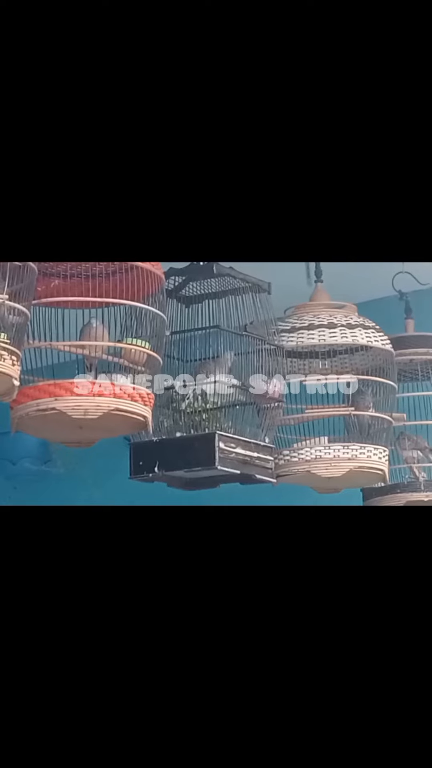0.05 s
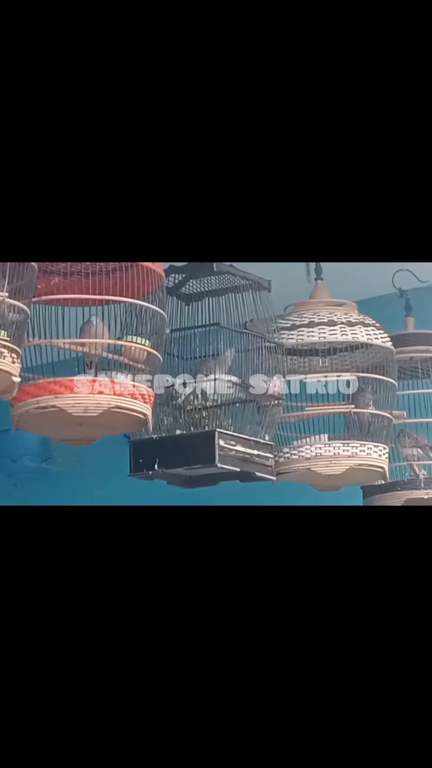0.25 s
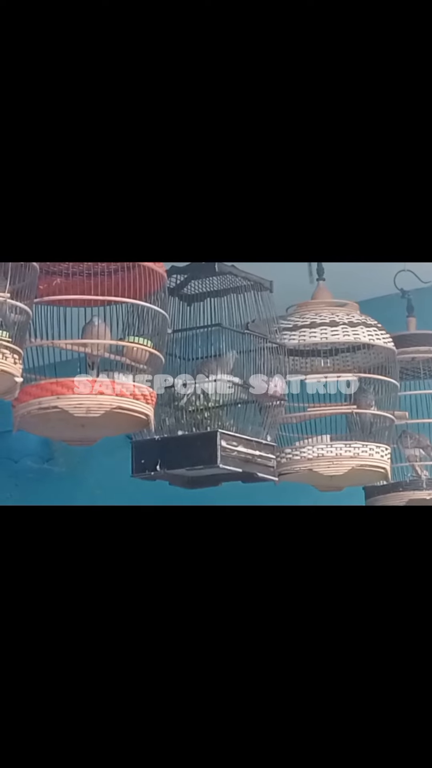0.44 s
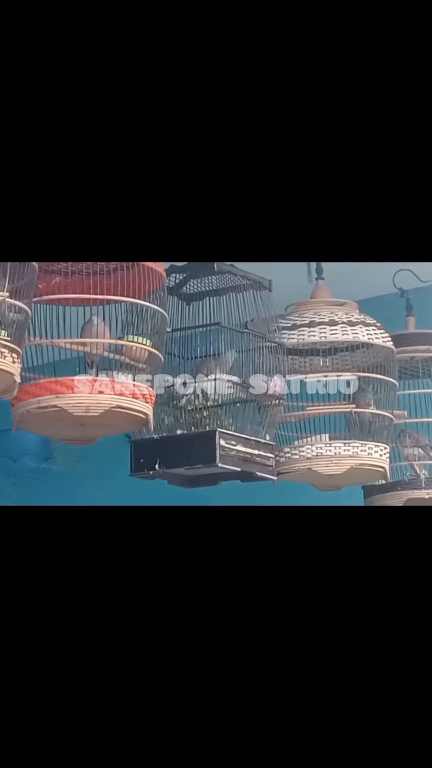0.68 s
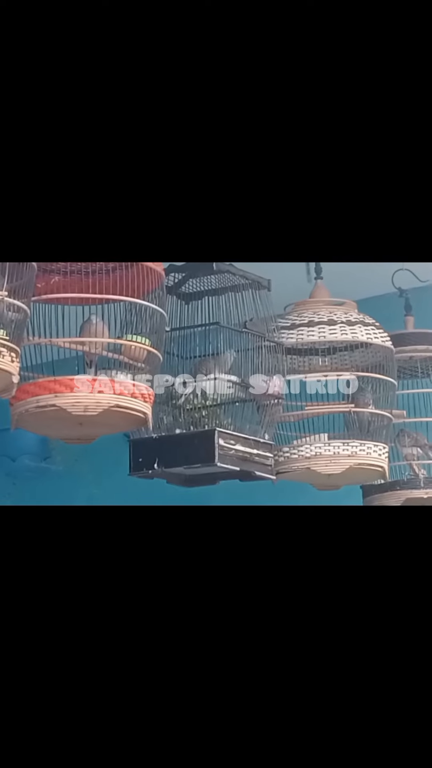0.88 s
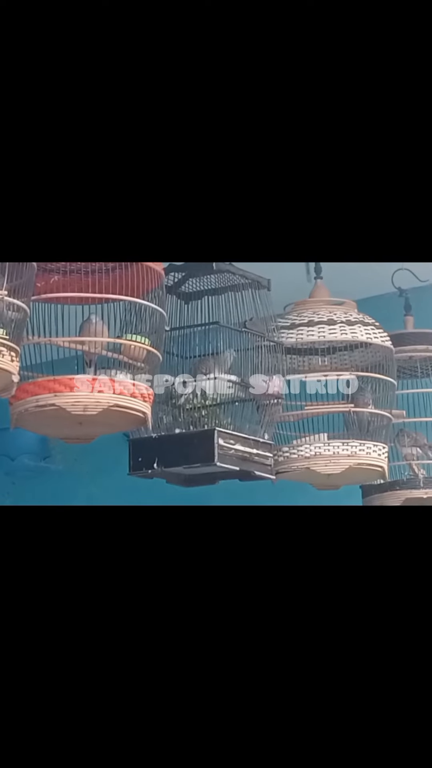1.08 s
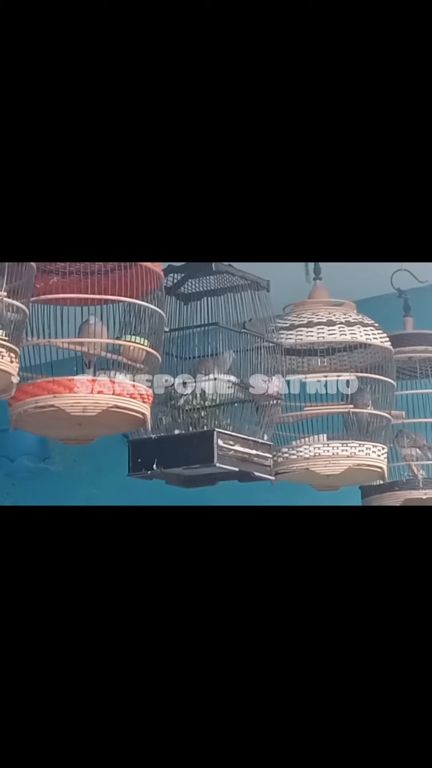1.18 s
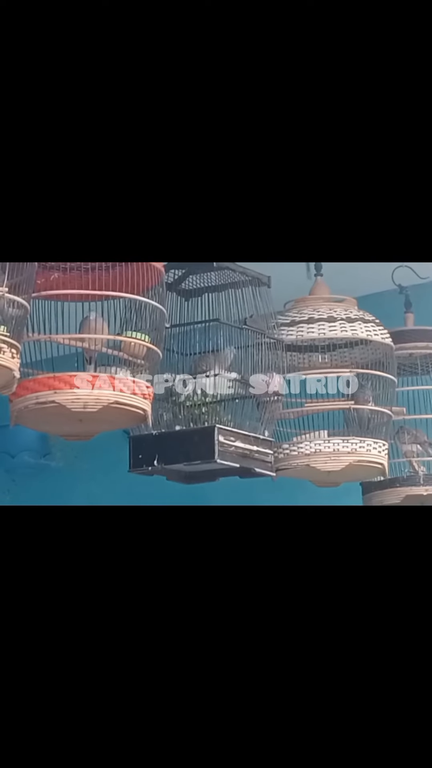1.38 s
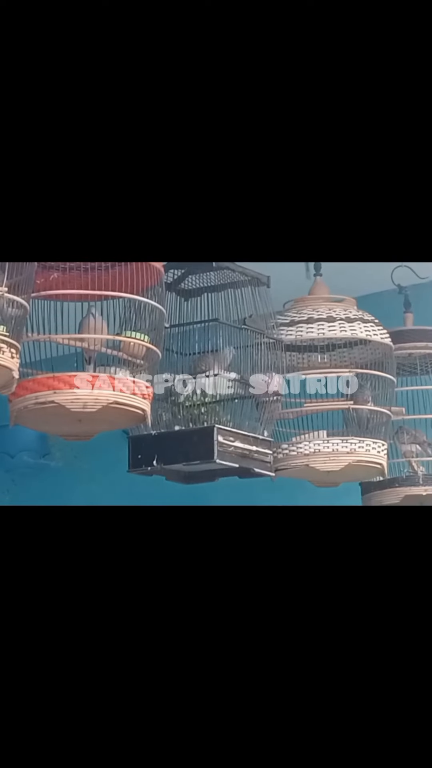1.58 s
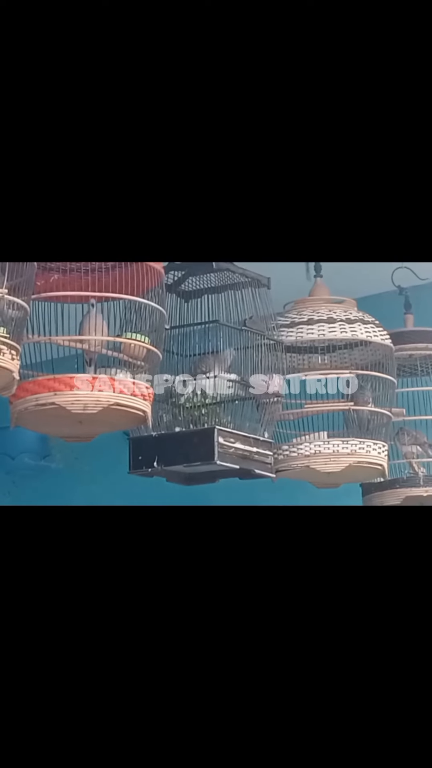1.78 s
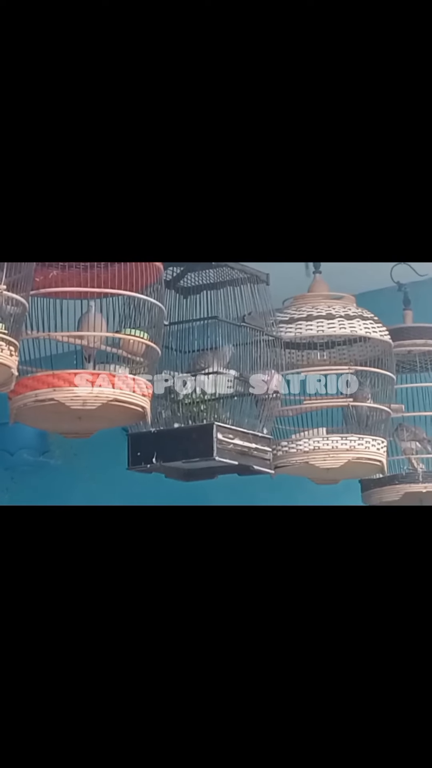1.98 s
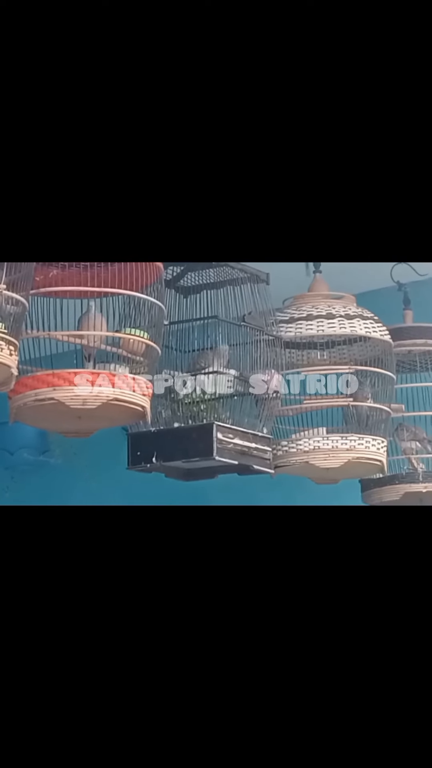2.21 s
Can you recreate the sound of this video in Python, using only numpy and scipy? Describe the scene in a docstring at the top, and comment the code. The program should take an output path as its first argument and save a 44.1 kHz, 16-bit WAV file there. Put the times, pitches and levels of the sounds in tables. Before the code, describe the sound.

A caged dove close by sings one quick phrase of whistled coos, a longer opening, three short notes and two drawn-out ones; echoes fade over soft distant doves, faint chirps and low outdoor rumble.

```python
"""Under a hard-walled porch a caged zebra dove sings one phrase: a long opening coo, three quick notes,
two drawn-out ones. Each is a near-pure tone with gliding pitch and overtones, smeared by echoes and a decaying tail.
Lower doves, also tones, coo far off. Filtered noise makes a small bird's raspy chirps, scuffs, a cage tick,
a far bird's hiss (with a thin falling whistle), steady air and an unsteady low outdoor rumble."""
import sys
import numpy as np
from scipy import signal
from scipy.fft import rfft, irfft
from scipy.io import wavfile

SR = 44100
rng = np.random.default_rng(int(sys.argv[2]) if len(sys.argv) > 2 else 0)


def transcribe(signal):
    """Save signal, clipped to [-1, 1], as a 16-bit WAV file at the path in sys.argv[1]."""
    frames = np.atleast_2d(signal).T
    limited = np.clip(frames, -1, 1)
    pcm = np.round(limited * 32767).astype(np.int16)
    wavfile.write(sys.argv[1], SR, pcm)


N = 99225
T = np.arange(N) / SR

# Steady air spectrum. Each row: frequency in Hz, relative level in dB.
AIR_SPECTRUM = [(15, -79.5), (25, -34), (71, -5.5), (150, -3.5), (207, -8.5), (271, -4), (326, -10),
                (363, -11), (769, -17.5), (1150, -17), (4750, -24.5), (7480, -22), (15000, -38.5)]
# Thin steady treble hiss. Each row: frequency in Hz, relative level in dB.
THIN_HISS_SPECTRUM = [(12800, -25), (13350, -12), (13500, 7), (13800, -20), (14300, -31.5)]
# Rumble spectrum. Each row: frequency in Hz, relative level in dB.
RUMBLE_SPECTRUM = [(40, -18), (75, -2), (130, 5), (190, -4), (350, -31.5)]
# Rumble level, uneven by chance. Each row: time in seconds, level in dB before RUMBLE_DB is added.
RUMBLE_LEVEL = [(0.0, -62), (0.23, -57), (0.26, -58), (0.28, -68), (0.39, -53.5), (0.69, -63.5),
                (0.75, -51.5), (1.08, -58), (1.11, -56.5), (1.35, -60.5), (1.5, -49), (1.54, -82),
                (1.98, -56), (2.01, -75), (2.09, -49.5), (2.25, -60)]
AIR_DB, THIN_HISS_DB = -55, -81
RUMBLE_DB, RUMBLE_SWING_DB, RUMBLE_SWING_HZ = -0.5, -0.3, 3.7

# Far dove, one list per coo. Each row: time in seconds, pitch in Hz, level in dB.
FAR_COOS = [
    [(.19, 574, -62), (.24, 598, -53), (.28, 605, -58)],
    [(.59, 608.6, -68), (.62, 609, -55.5), (.78, 607.2, -54), (.84, 627.7, -70), (.9, 596, -55.5),
     (1.02, 640.7, -62.5), (1.1, 606.7, -54), (1.18, 565, -63), (1.27, 549, -61.5), (1.34, 585, -63),
     (1.415, 619, -53), (1.44, 595, -82)],
]
# Faint level coos, farther still. Each row: start in seconds, length in seconds, pitch in Hz, level in dB.
FAINT_COOS = [(0.78, 0.38, 477, -62.5), (1.103, 0.23, 365, -60.5), (2.075, 0.7, 610, -59)]
FAR_WAVER_RATIO, FAR_WAVER_HZ, FAR_FLUTTER_DB = 0.0146, 31.6, 1.5

# Thin high hiss of a far bird. Each row: start in seconds, length in seconds, level in dB.
HISSES = [(.76, 0.28, -70.5), (1.8, .5, -68.5)]
# Hiss spectrum. Each row: frequency in Hz, relative level in dB.
HISS_SPECTRUM = [(6200, -43), (7100, 12), (7500, 7), (8200, 6), (9200, -3)]
# Its thin falling whistle. Each row: time in seconds, pitch in Hz, level in dB.
WHISTLE = [(.77, 8610, -66.5), (.84, 8160, -71.5), (.86, 7330, -71), (1.02, 7230, -68)]
# Faint scuffs in the cages. Each row: start in seconds, length in seconds, level in dB.
SCUFFS = [(1.13, 0.097, -62), (1.37, .105, -58.5), (1.98, .12, -61), (2.215, 0.076, -56.5)]
# Scuff spectrum. Each row: frequency in Hz, relative level in dB.
SCUFF_SPECTRUM = [(900, -26), (1500, 7), (2000, 8), (3000, -4), (6000, -20), (8500, 2.5), (11000, -12),
                  (15000, -13)]
# Raspy chirps. Each row: start in seconds, length in seconds, level in dB.
CHIRPS = [(-.06, 0.09, -40), (1.022, 0.11, -49), (1.988, 0.11, -48.5)]
# Chirp spectrum. Each row: frequency in Hz, relative level in dB.
CHIRP_SPECTRUM = [(1500, -16.5), (3200, -11.5), (3650, -3), (3950, 8), (4500, 3.5), (5000, -6.5),
                  (6000, -10), (9000, -13), (15000, -48)]
CHIRP_ATTACK_S, CHIRP_RELEASE_S, RASP_HZ, RASP_DB = 0.037, 0.081, 230, 3
# Cage ticks. Each row: start in seconds, onset level in dB.
TICKS = [(1.1711, -34)]
# Tick spectrum. Each row: frequency in Hz, relative level in dB.
TICK_SPECTRUM = [(2500, -1.5), (6000, -14), (8000, 9), (10000, -8), (12000, -46), (14000, -10), (15500, 6)]
TICK_DECAY_S = 0.00088

# Near walls. Each row: delay in seconds, gain in dB.
ECHOES = [(.00055, -13.5), (0.016, -9.5), (.01887, -26), (0.0231, -16), (.0325, -9.5), (.0495, -8.5),
          (.04997, -15), (.0631, -13.5), (0.089, -17)]
# Porch decay. Each row: frequency in Hz, time to fall 60 dB in seconds.
PORCH_T60 = [(200, 1), (1200, 0.57), (4000, 0.58), (12000, .083)]
# Porch pitches that ring on. Each row: frequency in Hz, gain at resonance in dB, time to fall 60 dB in seconds.
PORCH_MODES = [(880, -4, 0.26), (959, 7, 0.64), (968, -7.5, 0.28)]
PORCH_BUILD_S = 0.0013
COO_WET_DB, OVERTONE_WET_DB, FAR_WET_DB, SMALL_WET_DB = -4.5, -8.5, -6.5, -2.5
OCTAVE_WET_DB = 4.5  # second harmonic, heard mostly off the walls

# Opening coo, before the throat. Each row: time in seconds, pitch in Hz, level in dB.
OPENING_COO = [(.188, 730.7, -49), (.21, 949.7, -28.5), (.2167, 1150, -26.5), (.2318, 1210, -25),
               (.263, 1281, -23), (.2857, 1281, -26.5), (.305, 1216, -25.5), (.33, 1181, -27),
               (.34, 1063, -38), (.353, 1188, -28.5), (.369, 1187, -26), (.383, 900, -29.5)]
# Following coos, before the throat. Each row: start in seconds, length in seconds, top pitch in Hz, level in dB,
# sag in Hz per second, final drop in Hz, gain of the overtones above the octave in dB.
COOS = [(0.398, .0466, 1183, -25.5, 13, 252, 2), (0.465, 0.04, 1200, -25.5, 80, 282, 3),
        (.541, 0.041, 1211, -24.5, 318, 198, 0), (0.642, .095, 1208, -26, 940, 164, 1),
        (0.769, .15, 1209, -30, 1043, 90, -4)]
# Throat and crop resonances. Each row: frequency in Hz, gain in dB.
THROAT = [(600, 2.5), (800, -9), (940, 3), (1040, -0.5), (1200, 1), (1290, -6), (1400, -19), (2000, 17)]
# Windpipe and beak resonances on the overtones. Each row: frequency in Hz, gain in dB.
WINDPIPE_BEAK = [(2250, -38), (2400, -36.5), (2560, -43), (3550, -48.5), (3850, -44), (4300, -48.5),
                 (4680, -34), (4900, -49), (5120, -39), (5600, -44.5), (5980, -40), (6400, -39),
                 (7100, -62.5), (7650, -44.5), (9500, -57), (10800, -70), (11600, -53), (12600, -65)]
# Airy, throaty puffs around the starts of some coos. Each row: start in seconds, length in seconds, level in dB.
PUFFS = [(.185, 0.036, -40), (.362, 0.035, -38.5), (.637, 0.034, -39.5), (.752, 0.018, -34)]
# Puff spectrum. Each row: frequency in Hz, relative level in dB.
PUFF_SPECTRUM = [(860, -3.5), (950, 10), (1200, -7), (1350, -9.5), (1550, -26.5), (1900, -30.5),
                 (3000, -34.5)]
SCOOP_HZ, SCOOP_S, DROP_S = 389.2, .0122, .0045
ATTACK_S, RELEASE_S, FADE_DB_PER_S, HOLD_S = 0.02, 0.0044, 61.5, 0.0344
WAVER_RATIO, WAVER_HZ, SHIMMER_DB = .002, 31.4, 1.5
OVERTONE_FROM_HZ, OVERTONE_WIDTH_HZ, OVERTONE_FLICKER_DB = 1090, 13, 5
CUTOFF_HZ = 15600


def from_db(db):
    """Decibels to amplitude ratio."""
    return 10 ** (np.asarray(db) / 20)


def rms_one(x):
    """Scale to rms 1."""
    return x / np.sqrt(np.mean(x ** 2) + 1e-20)


def bin_hz():
    """Frequencies of the spectrum bins."""
    return np.arange(N // 2 + 1) * SR / N


def at_hz(points, hz):
    """Read a table on a log-frequency axis."""
    table_hz, values = np.transpose(points)
    return np.interp(np.log(hz + 1e-6), np.log(table_hz), values)


def shaped(x, resonances):
    """Pass a sound through fixed resonances."""
    return irfft(rfft(x) * from_db(at_hz(resonances, bin_hz())), N)


def noise(spectrum):
    """Noise of a given spectrum, dark beyond its ends; rms 1."""
    hz = bin_hz()
    top_skirt = 1 / (1 + (hz / spectrum[-1][0]) ** 8)
    bottom_skirt = 1 / (1 + (spectrum[0][0] / (hz + 1)) ** 8)
    gain = from_db(at_hz(spectrum, hz)) * np.sqrt(top_skirt * bottom_skirt)
    return rms_one(irfft(rfft(rng.standard_normal(N)) * gain, N))


def drift(corner_hz):
    """Random motion, mostly slower than the corner; rms 1."""
    return rms_one(irfft(rfft(rng.standard_normal(N)) / (1 + (bin_hz() / corner_hz) ** 2), N))


def gate(start, length, attack, release):
    """Smooth attack, hold, release."""
    rise = np.sin(np.pi / 2 * np.clip((T - start) / attack, 0, 1))
    fall = np.sin(np.pi / 2 * np.clip((start + length - T) / release, 0, 1))
    return rise * fall


def glide(rows):
    """Pitch and strength of a note from its curve."""
    s, hz, db = np.transpose(rows)
    strength = from_db(np.interp(T, s, db)) * gate(s[0], s[-1] - s[0], RELEASE_S, RELEASE_S)
    return np.interp(T, s, hz), strength


def bursts(rows, spectrum, attack=CHIRP_ATTACK_S, release=CHIRP_RELEASE_S):
    """Gated noise of one spectrum, roughened by fast random level changes."""
    level = sum(from_db(db) * gate(s, length, attack, release) for s, length, db in rows)
    return level * rms_one(noise(spectrum) * from_db(RASP_DB * drift(RASP_HZ)))


def syrinx(hz, strength, count=10):
    """A slightly wavering tone, its octave, and flickering overtones that come in at high pitch."""
    phase = 2 * np.pi * np.cumsum(hz * (1 + WAVER_RATIO * drift(WAVER_HZ))) / SR
    amplitude = np.sqrt(2) * strength * from_db(SHIMMER_DB * drift(WAVER_HZ))
    onset = .5 * (1 + np.tanh((hz - OVERTONE_FROM_HZ) / OVERTONE_WIDTH_HZ))
    harmonics = []
    for k in range(2, count + 1):
        flicker = from_db(OVERTONE_FLICKER_DB * drift(WAVER_HZ))
        harmonics.append(onset * flicker * np.sin(k * phase))
    return amplitude * np.array([np.sin(phase), harmonics[0], sum(harmonics[1:])])


def walls(x):
    """A few distinct reflections that beat against the gliding tone."""
    return x + sum(from_db(db) * np.interp(T - delay, T, x, left=0) for delay, db in ECHOES)


def porch(x, wet_db):
    """Direct sound plus a diffuse tail, its decay time set band by band."""
    t, tail = T[:SR], 0
    edges_hz = np.geomspace(150, 16000, 9)
    for low, high in zip(edges_hz, edges_hz[1:]):
        band_pass = signal.butter(2, [low, high], "band", fs=SR, output="sos")
        band = signal.sosfilt(band_pass, rng.standard_normal(SR))
        t60 = at_hz(PORCH_T60, np.sqrt(low * high))
        decay = np.exp(-np.log(1000) * t / t60) * (1 - np.exp(-t / PORCH_BUILD_S))
        tail = tail + band * decay / np.sqrt(np.sum(decay ** 2))
    return x + from_db(wet_db) * signal.fftconvolve(x, tail)[:N]


def ringing(x):
    """Narrow resonances of the porch, each a two-pole filter."""
    out = 0
    for hz, db, t60 in PORCH_MODES:
        r = np.exp(-np.log(1000) / (t60 * SR))
        poles = [1, -2 * r * np.cos(2 * np.pi * hz / SR), r * r]
        out = out + from_db(db) * (1 - r * r) / 2 * signal.lfilter([1, 0, -1], poles, x)
    return out


def background():
    """Steady air, a thin treble hiss and an unsteady rumble, all shaped noise."""
    air = from_db(AIR_DB) * noise(AIR_SPECTRUM)
    hiss = from_db(THIN_HISS_DB) * noise(THIN_HISS_SPECTRUM)
    level_db = np.interp(T, *np.transpose(RUMBLE_LEVEL))
    rumble_db = RUMBLE_DB + level_db + RUMBLE_SWING_DB * drift(RUMBLE_SWING_HZ)
    return air + hiss + from_db(rumble_db) * noise(RUMBLE_SPECTRUM)


def far_doves():
    """Soft, wavering, drawn-out coos about an octave or more lower; fundamentals only."""
    notes = [glide(rows) for rows in FAR_COOS]
    for s, length, hz, db in FAINT_COOS:
        notes.append((np.full(N, hz), from_db(db) * gate(s, length, length / 2, length / 2)))
    waver = 1 + FAR_WAVER_RATIO * drift(FAR_WAVER_HZ)
    flutter = from_db(FAR_FLUTTER_DB * drift(FAR_WAVER_HZ))
    return porch(sum(syrinx(hz * waver, strength * flutter)[0] for hz, strength in notes), FAR_WET_DB)


def small_sounds():
    """Chirps, scuffs and hisses of gated noise, plus a pure gliding whistle, in the porch."""
    chirps = bursts(CHIRPS, CHIRP_SPECTRUM)
    scuffs = bursts(SCUFFS, SCUFF_SPECTRUM)
    hisses = bursts(HISSES, HISS_SPECTRUM)
    whistle = syrinx(*glide(WHISTLE))[0]
    return porch(chirps + scuffs + hisses + whistle, SMALL_WET_DB)


def cage_ticks():
    """Tiny bright clicks: noise with instant onset and exponential decay."""
    level = sum(from_db(db) * (T >= s) * np.exp(-np.abs(T - s) / TICK_DECAY_S) for s, db in TICKS)
    return noise(TICK_SPECTRUM) * level


def near_dove():
    """The opening follows its curve; later coos scoop up, sag and fade while held, and drop at the end."""
    voice = syrinx(*glide(OPENING_COO))
    for start, length, top_hz, db, sag, drop_hz, bright_db in COOS:
        age = np.clip(T - start, 0, length)
        held = np.maximum(age - HOLD_S, 0)
        scoop = SCOOP_HZ * np.exp(-(age / SCOOP_S) ** 2)
        drop = drop_hz * np.exp((age - length) / DROP_S)
        hz = top_hz - scoop - sag * held - drop
        strength = from_db(db - FADE_DB_PER_S * held) * gate(start, length, ATTACK_S, RELEASE_S)
        voice = voice + syrinx(hz, strength) * from_db([[0], [0], [bright_db]])
    tone, octave, overtones = voice
    tone = shaped(tone, THROAT) + bursts(PUFFS, PUFF_SPECTRUM, attack=.01, release=0.013)
    octave = porch(shaped(octave, WINDPIPE_BEAK), OCTAVE_WET_DB)
    overtones = porch(shaped(overtones, WINDPIPE_BEAK), OVERTONE_WET_DB)
    return porch(walls(tone), COO_WET_DB) + ringing(tone) + octave + overtones


def scene():
    """Sum all layers into one channel."""
    return (background() + far_doves() + small_sounds() + cage_ticks() + near_dove())[None]


def record(dry):
    """Cut the top steeply with an elliptic low-pass."""
    return signal.sosfilt(signal.ellip(10, .1, 80, CUTOFF_HZ, fs=SR, output="sos"), dry)


dry = scene()
out = record(dry)
transcribe(out)
```